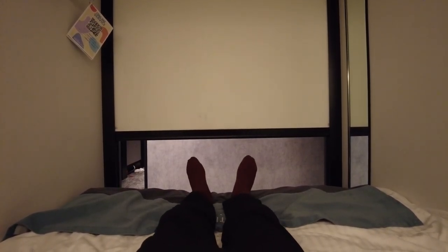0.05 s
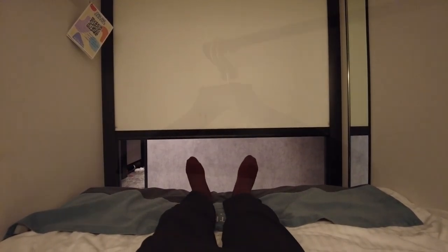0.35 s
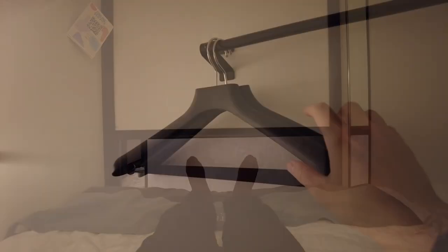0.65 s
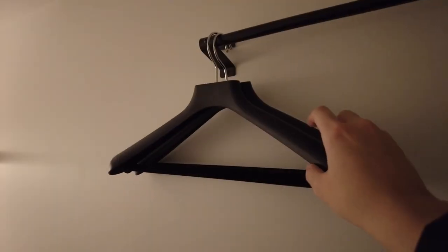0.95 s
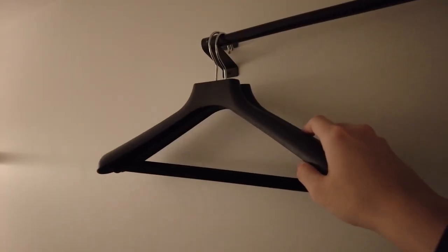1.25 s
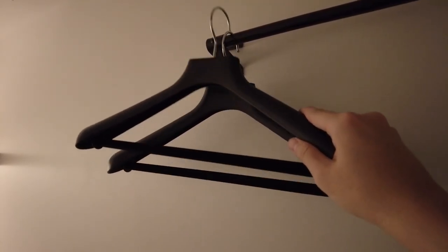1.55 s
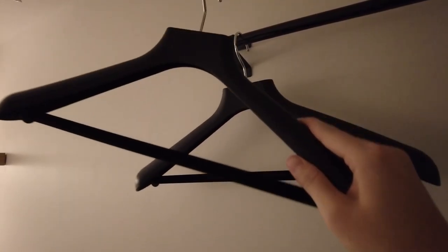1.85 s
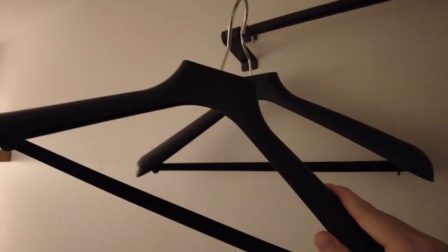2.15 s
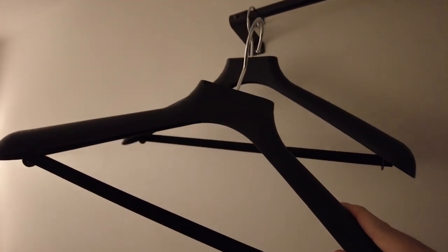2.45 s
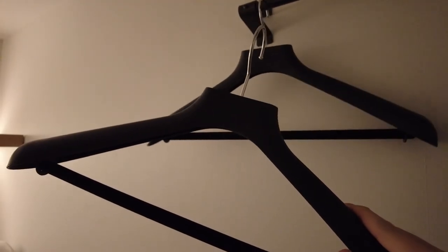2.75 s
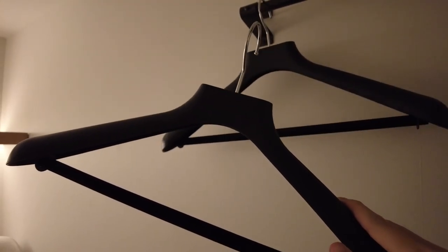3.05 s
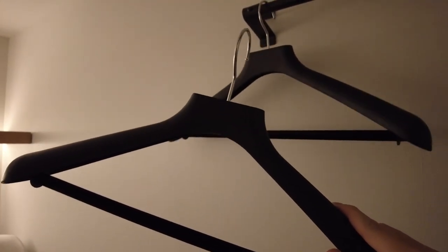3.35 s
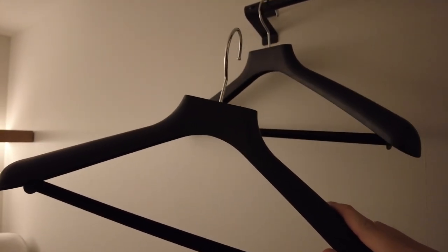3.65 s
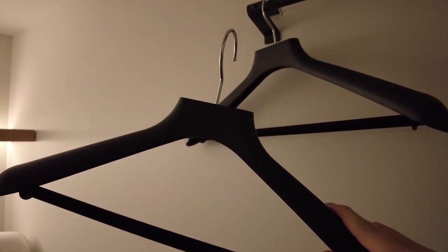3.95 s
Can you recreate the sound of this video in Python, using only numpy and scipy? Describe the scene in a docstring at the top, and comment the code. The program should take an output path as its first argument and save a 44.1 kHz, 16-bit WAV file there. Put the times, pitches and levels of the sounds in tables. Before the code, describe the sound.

A plastic coat hanger is taken off a rail in a small, quiet room. After faint sleeve rustle and ticks, its wire hook clicks, scrapes and clinks from about 1.1 seconds, clacking free loudest at 1.5. The hanger knocks hollowly against another at 2.8 seconds, soft low thuds follow, and a duller knock comes at 3.7. Faint hiss, rumble and hum lie underneath.

```python
"""In a small, quiet room, a plastic coat hanger with a wire hook is lifted off a wall rail.
The hook ticks and scrapes along the rail, clinks against the next hook and clacks free.
Then the hanger knocks twice against a second one: a crack, and the hollow ring of the plastic frame.
The second hanger swings with soft thuds. A sleeve rustles as the arm moves.
Faint hiss, low rumble and mains hum lie underneath."""
import sys
import numpy as np
from scipy import signal
from scipy.fft import rfft, irfft
from scipy.io import wavfile

SR = 44100
rng = np.random.default_rng(int(sys.argv[2]) if len(sys.argv) > 2 else 0)


def digitize_waveform(pressure):
    """Quantize a signal to 16-bit integers and store it at the path in sys.argv[1].

    Rows of a 2-D input are taken as channels; values are limited to [-1, 1].
    """
    field = np.atleast_2d(pressure).T
    bounded = np.clip(field, -1, 1)
    quanta = np.round(bounded * 32767).astype(np.int16)
    wavfile.write(sys.argv[1], SR, quanta)


N = 176400
TOP_HZ = 15750  # upper edge of the sound
CONTACT_RISE_S, CLICK_FADE_S = 0.000076, 0.018  # a fade time is the time to drop by 60 dB
CLICK_ROOM_DB, CRACK_ROOM_DB, WIRE_ROOM_DB = -1.5, -6.5, -10  # how much each sound fills the room
HOOK_LAG, KNOCK_LAG = 3, 1  # samples by which the left side is late


def amp(db):
    """Turns decibels into a gain."""
    return 10 ** (np.asarray(db) / 20)


def left_gain(db):
    """Changes the level of the left side only."""
    return amp([[db], [0]])


def unit(x):
    """Scales a sound to an average (rms) strength of one."""
    return x / np.sqrt(np.mean(x ** 2) + 1e-20)


def read(points, hz):
    """Reads a curve between its points, with octaves evenly spaced."""
    point_hz, values = np.transpose(points)
    return np.interp(np.log(hz + 1), np.log(point_hz + 1), values)


def level(points):
    """Gain over time from (seconds, dB) points."""
    return amp(np.interp(np.arange(N) / SR, *np.transpose(points)))


def add(mix, start, sound):
    """Mixes a sound in at a start time in seconds."""
    part = mix[:, round(start * SR):][:, :sound.shape[-1]]
    part += sound[..., :part.shape[1]]


def colour(x, *curves, size=4096):
    """Shapes the tone by the sum of (Hz, dB) curves, with no ringing ahead of the sound."""
    hz = abs(np.fft.fftfreq(size, 1 / SR))
    log_gain = np.log(amp(sum(read(curve, hz) for curve in curves)))
    response = np.exp(np.conj(signal.hilbert(log_gain)))
    taps = np.fft.ifft(response).real
    return signal.fftconvolve(x, taps[None, :size // 2], axes=1)


def slope(tilt_db, pivot_hz):
    """A curve that brightens or dulls by tilt_db per octave, flat below 176 Hz."""
    return [(hz, tilt_db * np.log2(hz / pivot_hz)) for hz in (176, TOP_HZ)]


def drift(hz):
    """A smooth random wander; a higher hz makes it quicker."""
    smoothing = np.exp(-(np.fft.rfftfreq(N, 1 / SR) / hz) ** 2)
    return unit(irfft(rfft(rng.standard_normal(N)) * smoothing, N))


def near_noise(size, likeness=0.59):
    """Noise from close by: mostly alike on the left and right."""
    shared, apart = rng.standard_normal((2, SR))[:, :size]
    return np.sqrt((1 + likeness) / 2) * shared + np.sqrt((1 - likeness) / 2) * np.array([apart, -apart])


def burst(fade_s):
    """The noisy, quickly dying shake of two things touching."""
    t = np.arange(SR // 4) / SR
    return near_noise(len(t)) * (1 - np.exp(-t / CONTACT_RISE_S)) * amp(-60 * t / fade_s)


def ring(pitches, tones, rise_s):
    """A struck object rings with several tones, each fading at its own pace."""
    t = np.arange(SR // 2) / SR
    ringing = sum(amp(db - 60 * t / fade_s) * np.sin(2 * np.pi * (hz * t + rng.random()))
                  for hz, (db, fade_s) in zip(pitches, tones))
    onset = 1 - np.exp(-(t / rise_s) ** 2)
    return ringing * onset * np.ones((2, 1))


# Sound spread round the room. Each row: frequency in Hz, how alike left and right are (1 is the same).
LIKENESS = [(30, 1), (150, 0.92), (300, 0.88), (600, 0.06), (1500, 0.33), (4000, 0.35), (12000, 0.31)]
def spread_noise(size):
    """Noise from all sides: left and right are most alike in the bass."""
    left, other = rfft(rng.standard_normal((2, size)))
    like = read(LIKENESS, np.fft.rfftfreq(size, 1 / SR))
    right = like * left + np.sqrt(1 - like ** 2) * other
    return irfft(np.array([left, right]), size)


# How long the room rings. Each row: frequency in Hz, fade time in seconds.
ROOM_FADE = [(100, 0.32), (300, 0.15), (1000, 0.23), (4000, 0.18), (9000, 0.18), (15000, 0.25)]
# Echoes off the near wall. Each row: delay in seconds, level in dB.
WALL_ECHOES = [(.0016, -7.5), (.0029, -10.5), (0.01, -19)]
def in_room(x, tail_db, lag=0):
    """A sound arrives directly, then off the wall, then as a short tail that lasts longest in the bass."""
    t = np.arange(SR // 2) / SR
    hz, times, spectrum = signal.stft(spread_noise(len(t)), SR, nperseg=256)
    fade = amp(-60 * times / read(ROOM_FADE, hz)[:, None])
    tail = signal.istft(spectrum * fade, SR, nperseg=256)[1][:, :len(t)]
    tail *= np.clip((t - 0.0022) / 0.011, 0, 1)  # a tiny gap, then it builds up
    out = amp(tail_db) * signal.fftconvolve(x, tail / np.linalg.norm(tail[0]), axes=1)
    add(out, 0, np.array([np.roll(x[0], lag), x[1]]))
    for delay, db in WALL_ECHOES:
        for side in (0, 1):
            add(out[side:side + 1], delay + 0.0004 * rng.random(), amp(db) * x[side])
    return out * left_gain(-0.5)


# Tone of the room's air and of the rumble. Each row: frequency in Hz, level in dB.
AIR_COLOUR = [(20, -79), (75, -59), (110, -29.5), (150, -34), (225, -46), (306, -43), (490, -51),
              (680, -53), (1000, -64.5), (1550, -57), (2100, -67), (4300, -70.5), (7000, -74.5),
              (9500, -75.5), (10500, -76), (15500, -89)]
RUMBLE_COLOUR = [(8, -23.5), (20, -1.5), (30, -8), (39, 5.5), (48, -23), (65, -16), (120, -29)]
# How the rumble and the hum rise and fall. Each row: time in seconds, level in dB.
RUMBLE_LEVELS = [(0, -48), (.25, -42.5), (.75, -42.5), (1.3, -47), (1.8, -45), (2.3, -47.5), (4, -45.5)]
HUM_LEVELS = [(0, -65.5), (.3, -58), (.55, -86), (1.05, -55), (2.2, -55), (4, -55.5)]
def room_tone(hum_hz=100):
    """Steady faint hiss, a slowly heaving rumble and a wavering mains hum."""
    hz = np.fft.rfftfreq(N, 1 / SR)
    air = irfft(rfft(spread_noise(N)) * amp(read(AIR_COLOUR, hz)), N)
    bass_only = amp(read(RUMBLE_COLOUR, hz)) * (hz < RUMBLE_COLOUR[-1][0])
    rumble = unit(irfft(rfft(spread_noise(N)) * bass_only, N)) * level(RUMBLE_LEVELS)
    waver = 0.16 * drift(hz=5)
    hum = np.sqrt(2) * np.sin(2 * np.pi * hum_hz * np.arange(N) / SR + waver) * level(HUM_LEVELS)
    return air * left_gain(-0.5) + rumble * left_gain(-3.5) + hum


# Moves of the arm. Each row: start in seconds, length in seconds, level in dB, tilt in dB per octave.
ARM_MOVES = [(0.164, 0.8, -60.5, -1), (1.58, 0.8, -66.5, 0.5), (2.07, 0.81, -70.5, 2.5)]
# Tone of the cloth. Each row: frequency in Hz, level in dB.
CLOTH_COLOUR = [(200, 1), (800, 2.5), (1400, 8), (2200, 3.5), (2900, 6), (3700, 0.5), (4300, 2),
                (5200, -0.5), (7700, -2.5), (10000, -6), (15500, -6)]
def sleeve():
    """Cloth brushes with each move of the arm, louder as the arm goes faster."""
    out = np.zeros((2, N))
    cloth = spread_noise(N) * amp(drift(hz=80))  # a grain of about 1 dB
    for start, length, db, tilt_db in ARM_MOVES:
        speed = np.sin(np.pi * np.clip((np.arange(N) / SR - start) / length, 0, 1))
        add(out, 0, amp(db) * colour(cloth * speed ** 1.65, CLOTH_COLOUR, slope(tilt_db, pivot_hz=3020)))
    return out


# Ticks of the plastic. Each row: start in seconds, level in dB.
TICKS = [(0.244, -48.5), (0.895, -49), (2.227, -52)]
# Tone of a tick or crack of plastic. Each row: frequency in Hz, level in dB.
PLASTIC_COLOUR = [(60, -9), (250, 16.5), (450, 20), (580, -1.5), (700, 5.5), (830, 7.5), (1050, -7),
                  (1300, 6), (2000, 1.5), (2900, -1), (4500, -12), (5400, -7), (7200, -17.5), (9500, -18),
                  (10500, -25), (15000, -29)]
def plastic_ticks():
    """The plastic ticks faintly as it is handled."""
    out = np.zeros((2, N))
    for start, db in TICKS:
        tick = colour(burst(CLICK_FADE_S), PLASTIC_COLOUR)
        add(out, start, amp(db) * in_room(tick, CRACK_ROOM_DB))
    return out


# Soft thuds. Each row: start in seconds, length in seconds, level in dB.
THUDS = [(.87, 0.16, -50.5), (1.038, 0.7, -50), (1.561, 0.23, -50), (2.982, 0.11, -41.5),
         (3.264, 0.1, -40.5)]
# Tone of a thud. Each row: frequency in Hz, level in dB.
THUD_COLOUR = [(40, -34), (90, 2), (140, 20.5), (200, 3), (300, 4), (480, -17), (620, -3), (800, -9.5),
               (1000, -48), (4000, -54)]
def thuds():
    """The hand and the swinging hanger make low thuds that swell quickly and fade."""
    out = np.zeros((2, N))
    for start, length, db in THUDS:
        progress = np.linspace(0, 1, round(length * SR))
        swell = np.sin(np.pi * progress ** 0.54)
        thud = colour(near_noise(len(swell)) * swell, THUD_COLOUR)
        add(out, start, amp(db) * in_room(thud, tail_db=-4.5))
    return out


# Slides along the rail. Each row: start in seconds, length in seconds, level in dB.
SCRAPES = [(1.155, 0.22, -52), (1.397, 0.073, -48), (1.508, 0.035, -34.5), (1.564, 0.066, -38.5)]
# Tone of a scrape. Each row: frequency in Hz, level in dB.
SCRAPE_COLOUR = [(100, -1.5), (900, -18), (1600, -9.5), (3500, -5), (6000, -12), (9000, -19.5),
                 (15000, -25)]
def hook_scrapes(slips_per_s=2400, slip_range_db=13):
    """The sliding hook sticks and slips in tiny uneven clicks."""
    out = np.zeros((2, N))
    for start, length, db in SCRAPES:
        size = round(length * SR)
        slipping = rng.random(SR) < slips_per_s / SR
        slips = slipping * amp(-slip_range_db * rng.random(SR))
        clicks = unit(slips[:size] * np.sign(near_noise(size)))
        scrape = colour(clicks * np.sqrt(np.hanning(size)), SCRAPE_COLOUR)
        add(out, start, amp(db) * in_room(scrape, CLICK_ROOM_DB))
    return out


# Hook touching hook. Each row: start in seconds, level in dB.
CLINKS = [(1.218, -59), (1.3661, -45.5)]
# The next hook's pitches in Hz, then a row for each pitch: level in dB, fade time in seconds.
NEXT_HOOK_HZ = (850, 2000, 3241, 3790, 6350, 8705, 9250, 9991)
NEXT_HOOK_TONES = [(-14, .14), (-13, .1), (-4, .12), (3, .09), (-2, .08), (-1, .06), (3, .06), (-4, .06)]
def hook_clinks():
    """The moving hook touches the next one, which rings thin and clear."""
    out = np.zeros((2, N))
    for start, db in CLINKS:
        clink = ring(NEXT_HOOK_HZ, NEXT_HOOK_TONES, CONTACT_RISE_S)
        add(out, start, amp(db) * in_room(clink, WIRE_ROOM_DB, HOOK_LAG))
    return out


# The frame's pitches in Hz, then a row for each pitch: level in dB, fade time in seconds.
FRAME_HZ = (176, 240, 273, 305, 364, 544, 588, 1245, 1712, 2495)
FRAME_TONES = [(2, 0.14), (1, 0.094), (-1.5, 0.096), (-2, 0.07), (-5.5, 0.15), (-6, 0.1), (-9, 0.042),
               (-27, 0.17), (-33, 0.17), (-27, 0.11)]
def frame_ring(tilt_db):
    """The plastic frame rings hollow; a tilt below zero gives the duller sound of a softer blow."""
    body = ring(FRAME_HZ, FRAME_TONES, rise_s=0.0016)
    return in_room(colour(body, slope(tilt_db, pivot_hz=278)), tail_db=-9, lag=KNOCK_LAG)


# Shudders of the frame. Each row: start in seconds, level in dB.
SHUDDERS = [(1.22, -53.5), (1.287, -50), (1.498, -42), (1.552, -43)]
def frame_shudders():
    """The frame shakes as the hook catches and springs free."""
    out = np.zeros((2, N))
    for start, db in SHUDDERS:
        add(out, start, amp(db) * frame_ring(tilt_db=-3))
    return out


# Hanger against hanger. Each row: start in seconds, the frame's level in dB and tilt in dB per octave,
# then the crack's level and tilt in the same units.
KNOCKS = [(2.8049, -33.5, 2, -36.5, 0.5), (3.6898, -33.5, -6, -45, -1.5)]
def hanger_knocks():
    """Plastic meets plastic: a snap and a dull crack, then the ring of the frame."""
    out = np.zeros((2, N))
    for start, frame_db, frame_tilt_db, crack_db, crack_tilt_db in KNOCKS:
        snap = amp(5.5) * burst(fade_s=0.017)
        crack = colour(snap + burst(fade_s=0.16), PLASTIC_COLOUR, slope(crack_tilt_db, pivot_hz=1090))
        add(out, start, amp(crack_db) * in_room(crack, CRACK_ROOM_DB, KNOCK_LAG))
        add(out, start + 0.00299, amp(frame_db) * frame_ring(frame_tilt_db))
    return out


# Hook hitting rail. Each row: start in seconds, four levels in dB (low, middle, treble, top),
# the pitch of a peak in the click in Hz, its height in dB, the wire's level next to the click in dB.
CLACKS = [(1.076, -50, -41, -48.5, -50, 9900, 3.5, -26), (1.219, -43, -34.5, -46, -55, 3900, 10, -44),
          (1.2877, -43, -40, -66, -58, 1800, 14.5, -38), (1.3663, -40.5, -32, -35, -52, 3350, 5, -34),
          (1.4937, -37, -35, -38, -54, 8100, 0, -16), (1.4975, -26.5, -28.5, -30, -26, 4690, 22.5, -14.5),
          (1.5026, -24, -30.5, -31, -39, 3050, 14.5, -16.5), (1.5303, -38, -33, -39, -38, 3430, 13.5, -21),
          (1.5313, -47, -23.5, -34, -36, 3850, 5.5, -35), (1.5945, -45, -31.5, -36.5, -45, 4500, 2, -33),
          (1.609, -48.5, -40.5, -50, -54, 4500, 16, -34)]
# Where those four levels sit, in Hz.
BANDS_HZ = (1100, 3800, 9000, 14000)
# Tone shared by all the clicks. Each row: frequency in Hz, level in dB.
CLICK_COLOUR = [(60, -24.5), (230, 16.5), (340, 8.5), (470, -32), (590, 7.5), (720, -1.5), (900, 10),
                (1100, -1), (1330, 9), (1650, -2.5), (2200, 4), (3700, -0.5), (4900, -3), (5500, -2),
                (6300, 2), (7000, -3), (8000, 7.5), (8600, 2), (9800, 7), (10900, -3), (12500, 3.5),
                (13600, 0), (15500, -2)]
# The wire hook's pitches in Hz, then a row for each pitch: level in dB, fade time in seconds.
WIRE_HZ = (830, 905, 1028, 1480, 2293, 2872, 3244, 3279, 3460, 3882, 4133, 4439, 4856, 5030, 12473)
WIRE_TONES = [(-9, .25), (-9, .25), (-11, .2), (-10, .2), (-13, .2), (-4, .2), (-6, .2), (-7, .2), (-5, .2),
              (-4, .18), (-5, .18), (-2, .18), (1, .12), (1, .12), (-1, .13)]
def hook_clacks(peak_width_ratio=1.345):
    """Each hit on the rail makes a click with its own tone and sets the wire ringing."""
    out = np.zeros((2, N))
    for start, *bands_db, hz, peak_db, wire_db in CLACKS:
        wire = ring(WIRE_HZ, WIRE_TONES, CONTACT_RISE_S)
        clack = amp(wire_db) * in_room(wire, WIRE_ROOM_DB, HOOK_LAG)
        peak = [(hz / peak_width_ratio, 0), (hz, peak_db), (hz * peak_width_ratio, 0)]
        click = colour(burst(CLICK_FADE_S), CLICK_COLOUR, peak)
        add(clack, 0, in_room(click, CLICK_ROOM_DB, HOOK_LAG))
        add(out, start, colour(clack, list(zip(BANDS_HZ, bands_db))))
    return out * left_gain(-1)


def scene():
    """The hooks, the plastic and the sleeve over the tone of the room."""
    hooks = hook_clacks() + hook_clinks() + hook_scrapes()
    plastic = hanger_knocks() + frame_shudders() + thuds()
    return hooks + plastic + sleeve() + plastic_ticks() + room_tone()


def record(dry):
    """Cuts away the treble above TOP_HZ."""
    low_pass = signal.firwin(511, TOP_HZ, window=("kaiser", 9), fs=SR)
    return signal.oaconvolve(dry, low_pass[None], "same")


dry = scene()
out = record(dry)
digitize_waveform(out)
```